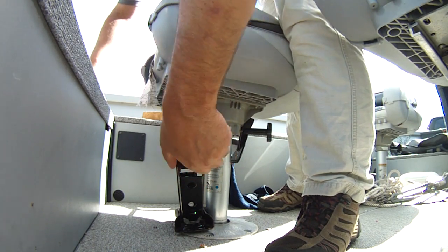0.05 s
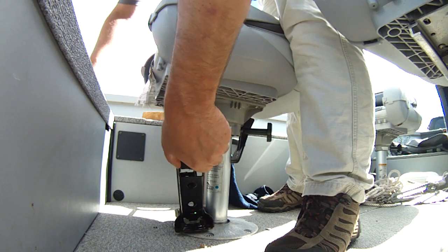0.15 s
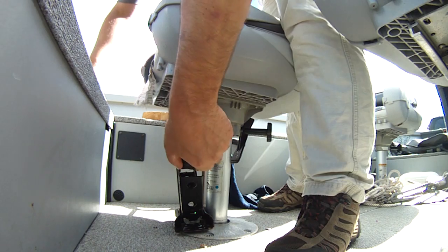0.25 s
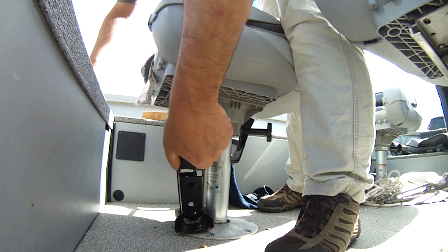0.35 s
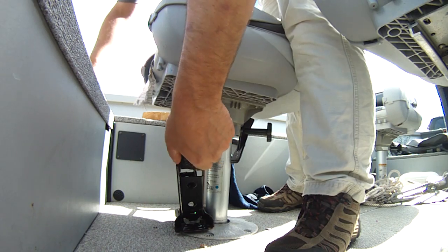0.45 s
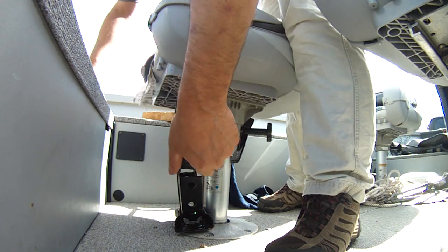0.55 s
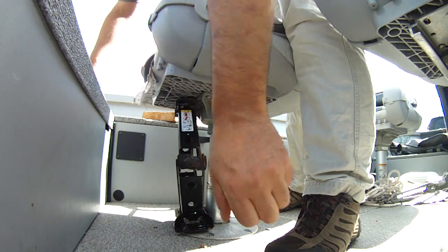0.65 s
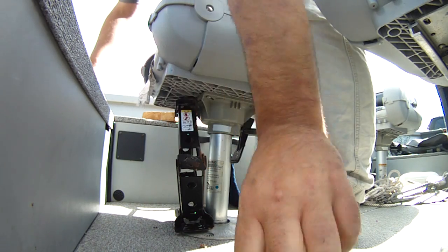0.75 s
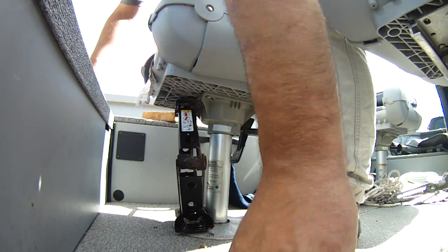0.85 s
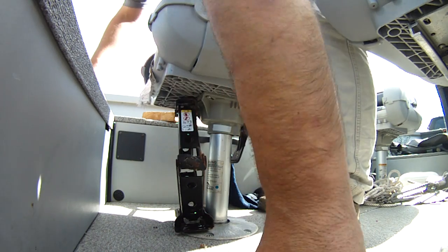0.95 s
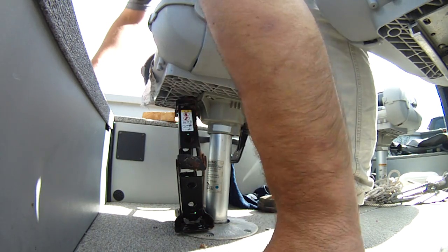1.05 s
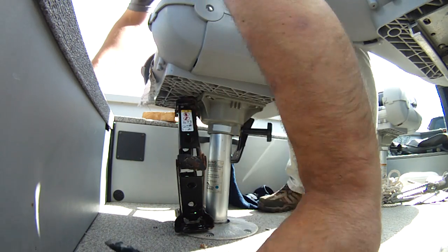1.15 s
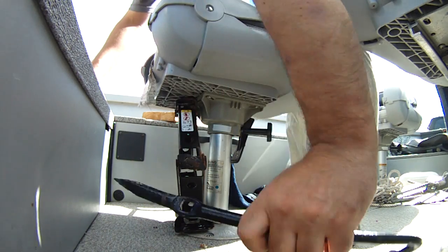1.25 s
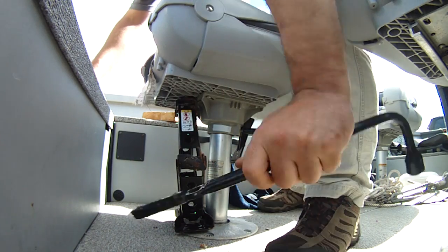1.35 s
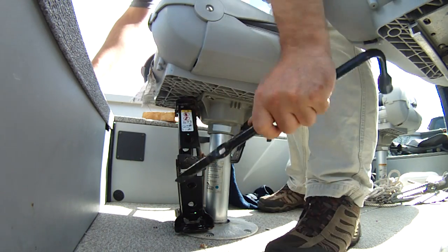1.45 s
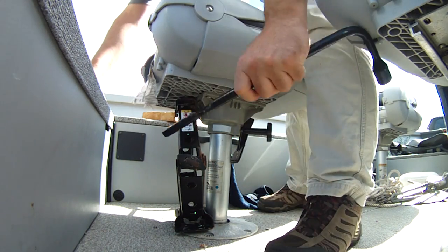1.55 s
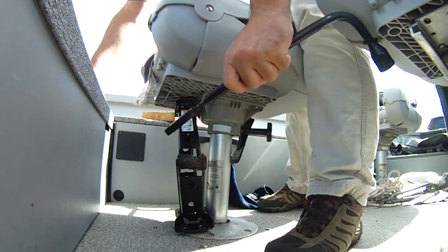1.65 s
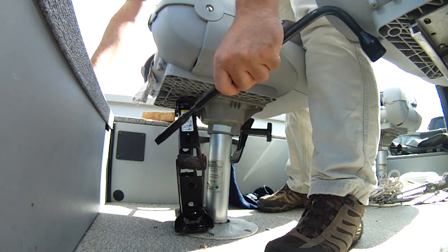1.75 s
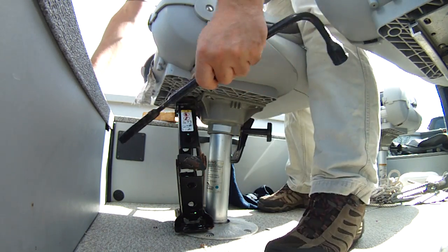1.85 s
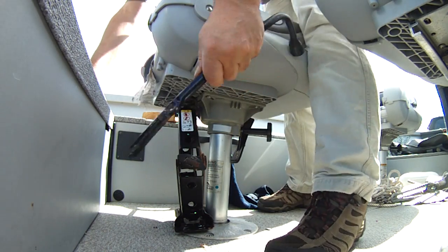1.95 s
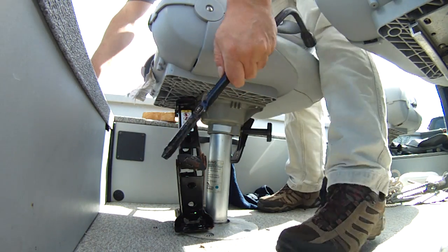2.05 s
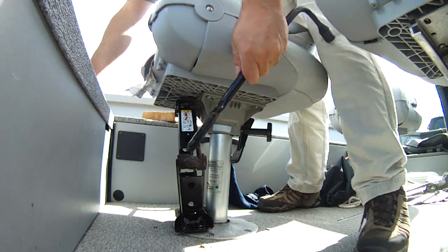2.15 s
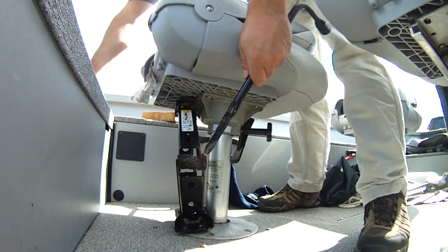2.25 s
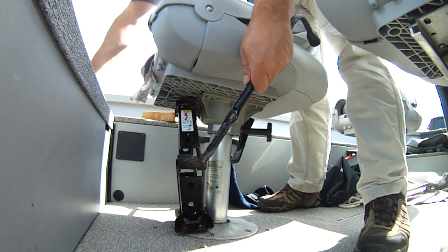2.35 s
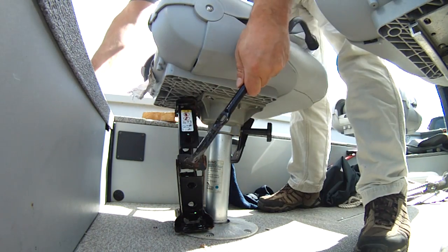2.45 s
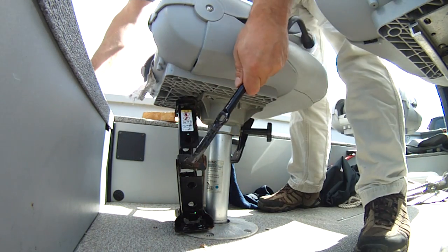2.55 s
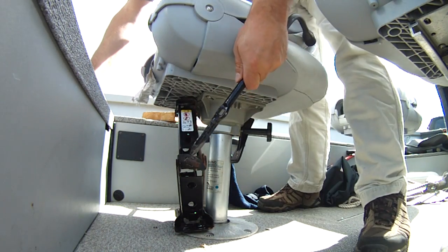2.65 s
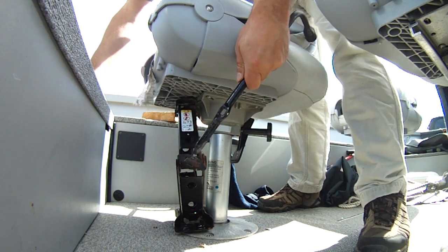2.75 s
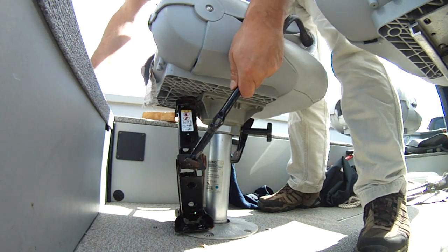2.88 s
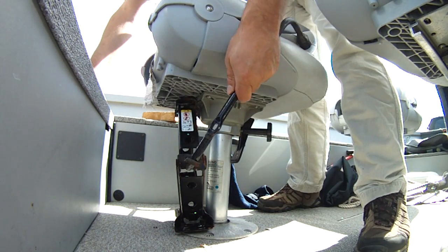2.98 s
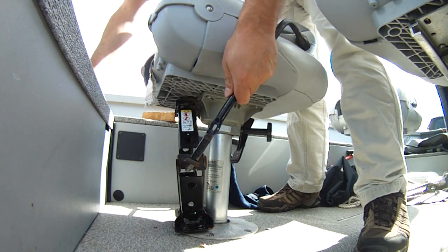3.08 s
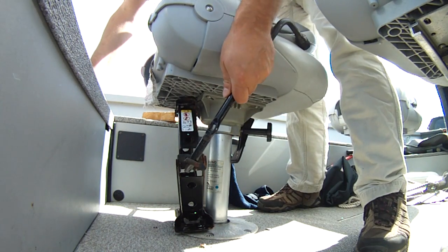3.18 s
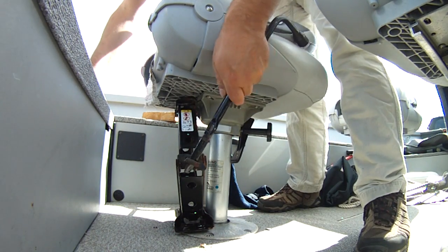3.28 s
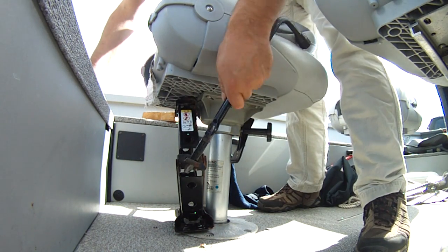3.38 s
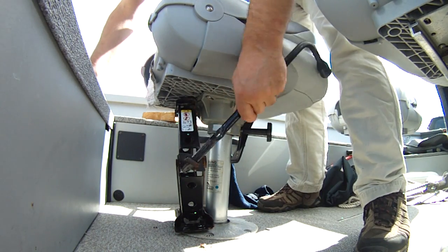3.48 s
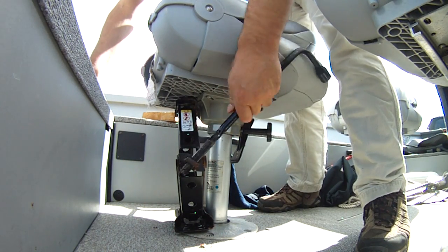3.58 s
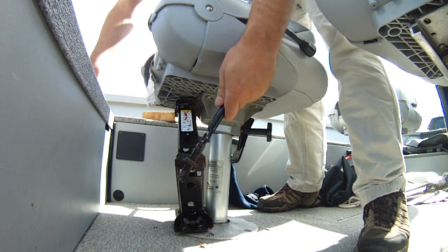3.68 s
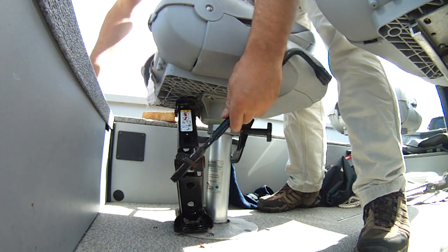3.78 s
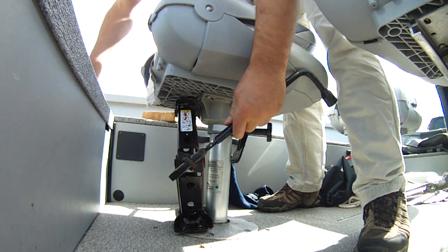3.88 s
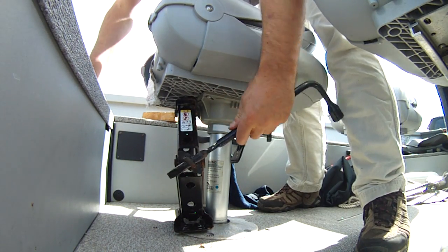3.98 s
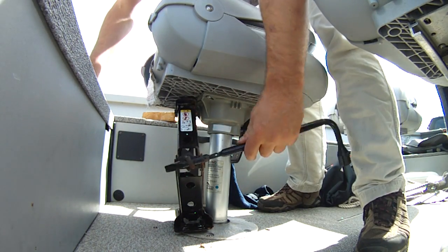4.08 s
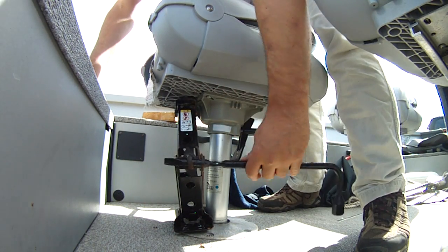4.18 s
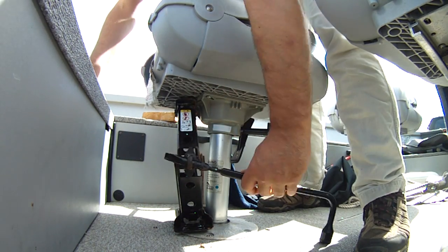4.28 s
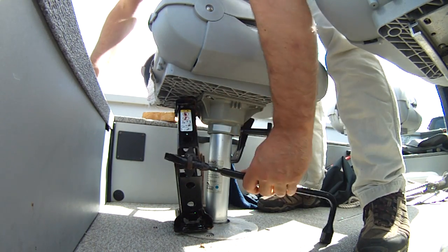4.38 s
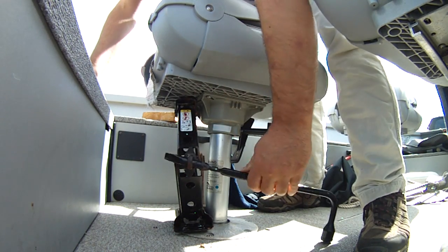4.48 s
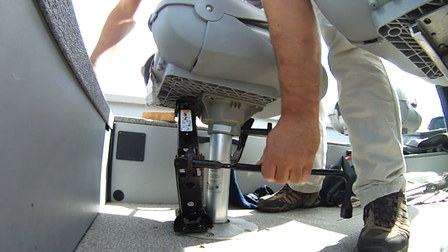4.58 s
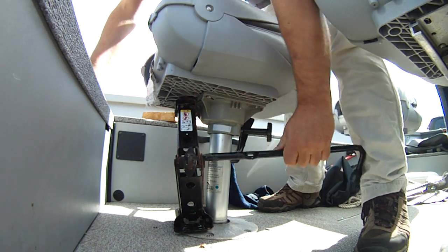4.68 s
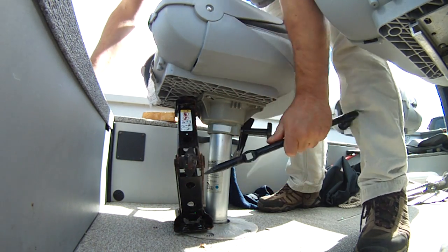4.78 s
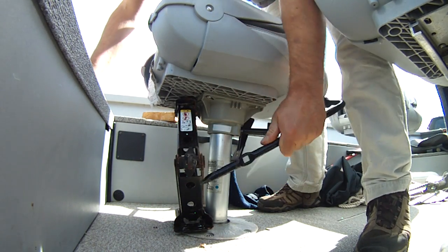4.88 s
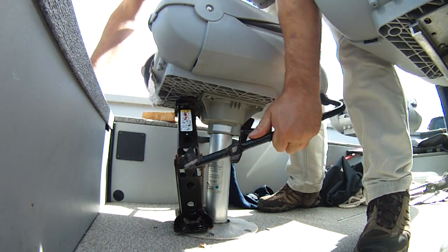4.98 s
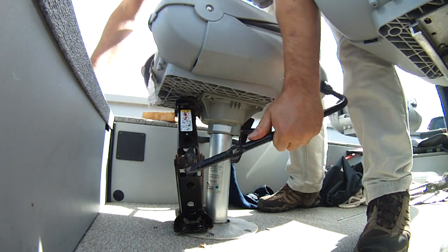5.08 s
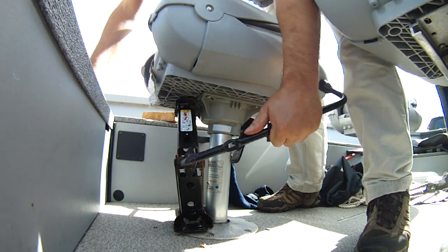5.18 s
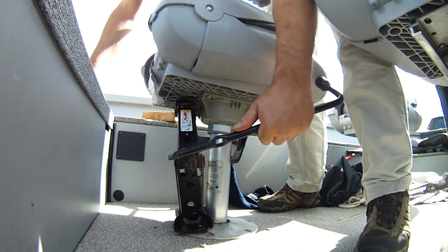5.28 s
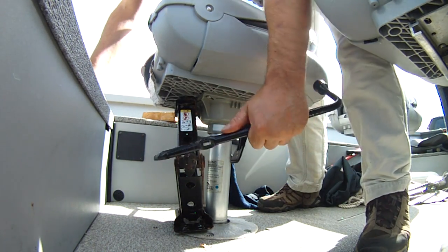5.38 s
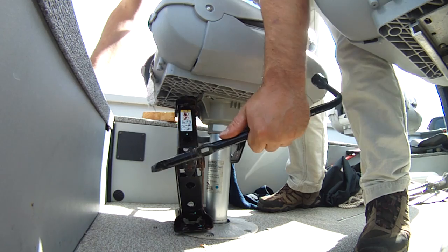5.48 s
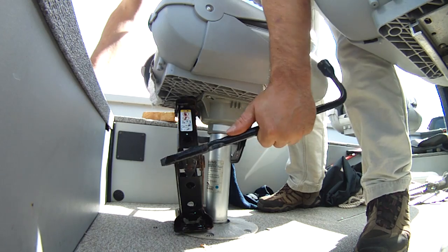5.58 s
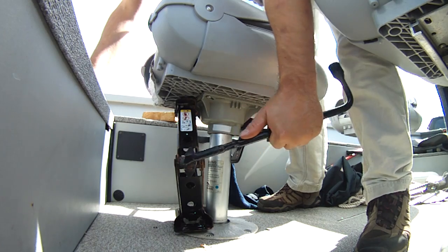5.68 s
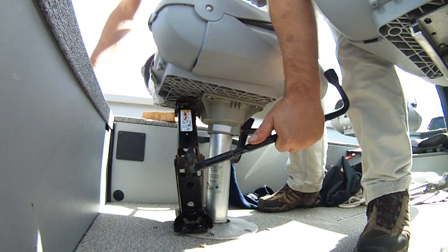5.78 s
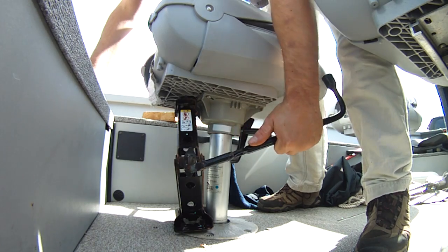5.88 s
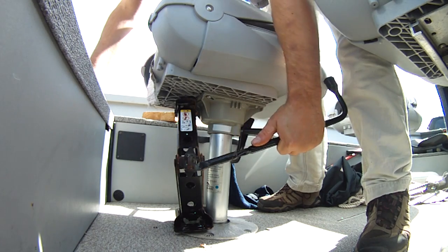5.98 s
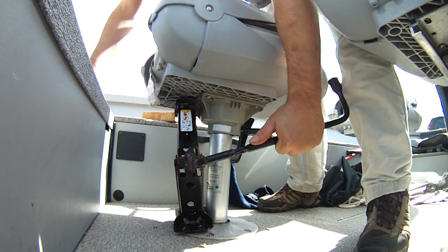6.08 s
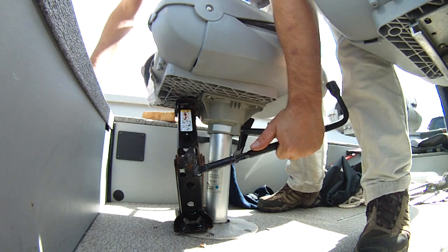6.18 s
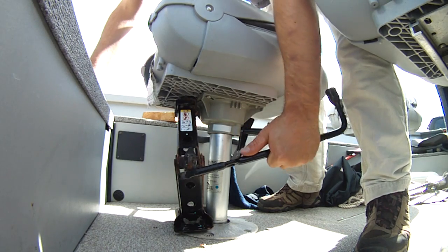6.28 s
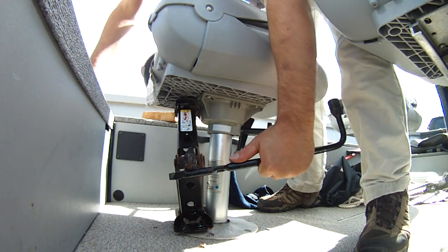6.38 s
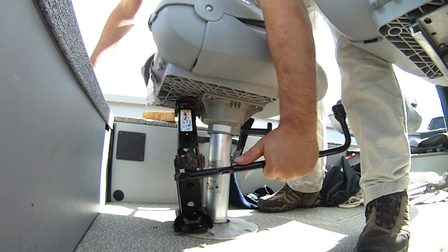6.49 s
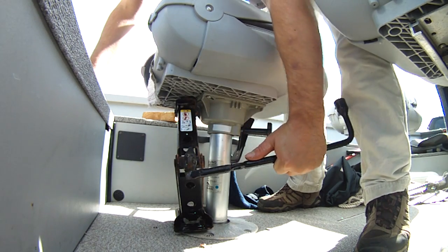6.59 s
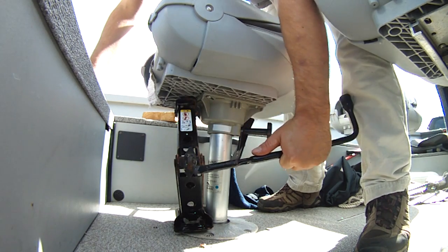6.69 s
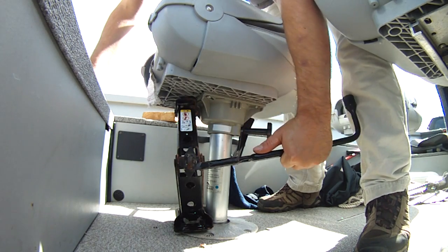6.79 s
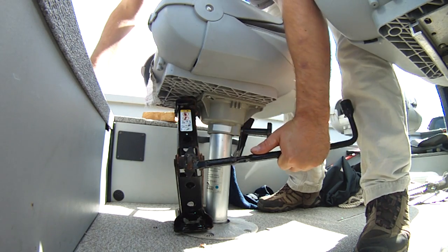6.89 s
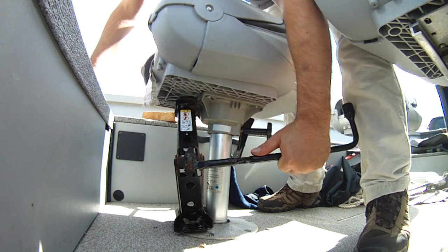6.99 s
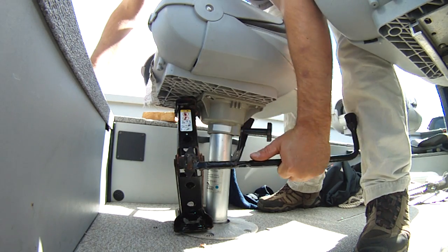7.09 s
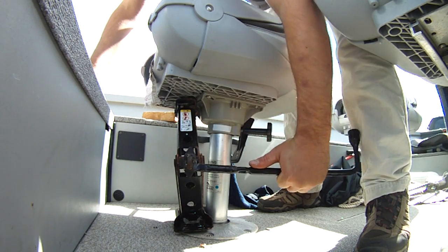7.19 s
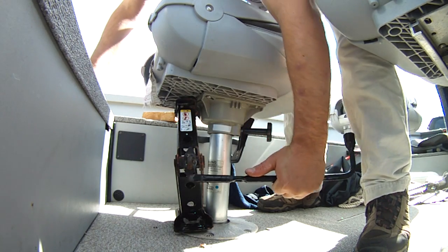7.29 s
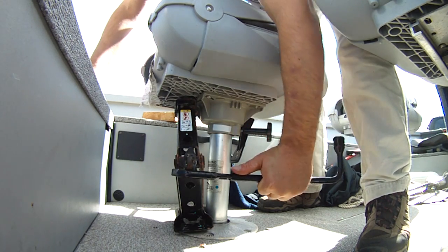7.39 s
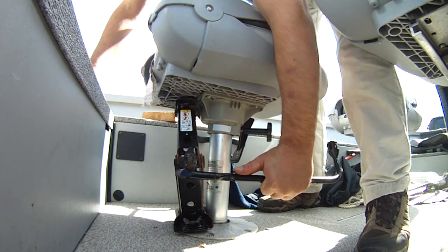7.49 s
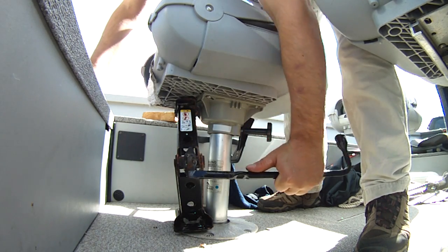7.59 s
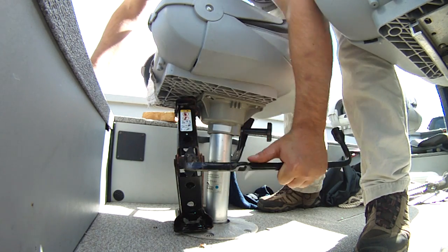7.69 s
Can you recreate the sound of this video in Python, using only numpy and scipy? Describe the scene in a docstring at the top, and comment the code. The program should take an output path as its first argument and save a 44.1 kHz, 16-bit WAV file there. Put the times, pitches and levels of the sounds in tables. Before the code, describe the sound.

Metal rod clunks, scrapes and rattles against a jack in uneven bunches, sharpening to hard clanks, over faint open-air rumble and hiss.

```python
"""A scissor jack under a stuck seat post on a small boat: dull knocks as it is shoved into place, then clanks,
scrapes and pings in irregular bunches as its steel crank rod is poked into the eye and turned.
Trains of tiny impacts drive noise-like and modal responses of jack and hollow carpeted deck together.
Grazes are bright noise bursts, pings are decaying rod modes; below lie a faint noise rumble and hiss."""
import sys
import numpy as np
from scipy import signal
from scipy.fft import rfft, irfft
from scipy.io import wavfile
from scipy.ndimage import uniform_filter1d

SR = 44100
rng = np.random.default_rng(int(sys.argv[2]) if len(sys.argv) > 2 else 0)


def dump_mix(stems):
    """Bounce the given channels to the path in sys.argv[1] as a 16-bit WAV at rate SR."""
    frames = np.atleast_2d(stems).T  # one column per channel
    limited = np.clip(frames, -1, 1)  # hard clip at full scale
    pcm = np.round(limited * 32767).astype(np.int16)
    wavfile.write(sys.argv[1], SR, pcm)


N = 341334
RESPONSE_S = 0.6
T = np.arange(int(RESPONSE_S * SR)) / SR
CONTACT_S = 0.03  # span over which blow, graze and ping levels are reckoned


def amp(db):
    """Decibels to gain."""
    return 10 ** (np.asarray(db) / 20)


def level(x, db, seconds):
    """Scale x to the energy of a sound that holds this rms level for so many seconds."""
    return x * amp(db) * np.sqrt(seconds * SR / np.sum(x ** 2))


def unit_energy(x, db=0):
    """Scale x to an energy of 1, or of db relative to 1."""
    return level(x, db, 1 / SR)


def fade(t60_s):
    """Exponential decay by 60 dB in t60_s."""
    return np.exp(-np.log(1000) * T / t60_s)


def drive(force, response):
    """What a body with this impulse response does under a force."""
    return signal.fftconvolve(force, response)[:len(force)]


def colour(x, spectrum, size=4096):
    """Causal minimum-phase filter with a (Hz, dB) spectrum, built from its cepstrum."""
    hz, db = np.transpose(spectrum)
    bins_hz = np.maximum(np.arange(size // 2 + 1) * SR / size, 1)
    gain = amp(np.interp(np.log(bins_hz), np.log(hz), db))
    cepstrum = irfft(np.log(gain))
    cepstrum[1:size // 2] *= 2  # fold onto positive time
    cepstrum[size // 2 + 1:] = 0
    return drive(x, irfft(np.exp(rfft(cepstrum))))


def ring(modes, scatter_db=1.5, detune=0.0031):
    """Damped modes; each point of contact weights and detunes them a little differently."""
    out = np.zeros(len(T))
    for hz, db, t60_s in modes:
        gain_chance, pitch_chance, sign_chance = rng.standard_normal(3)
        gain = np.sign(sign_chance) * amp(db + scatter_db * gain_chance)
        mode_hz = hz * (1 + detune * pitch_chance)
        out += gain * fade(t60_s) * np.sin(2 * np.pi * mode_hz * T)
    return out


def body(spectrum, t60_s, tail_db, tail_t60_s, direct_db):
    """Unit-energy response of crowded modes: a direct pulse, a quick decay and a faint echo from the cockpit."""
    envelope = fade(t60_s) + amp(tail_db) * fade(tail_t60_s)
    crowd = unit_energy(rng.standard_normal(len(T)) * envelope)
    crowd[0] += amp(direct_db)
    return unit_energy(colour(crowd, spectrum))


def slips(rate_per_s, spread_db):
    """Irregular train of tiny impacts of uneven size and random sign."""
    hits = rng.random(len(T)) < rate_per_s / SR
    sizes = amp(spread_db * rng.standard_normal(len(T)))
    return hits * sizes * rng.choice([-1, 1], len(T))


def add(track, start_s, sound):
    """Mix a sound into the track at a time."""
    start = int(start_s * SR)
    track[start:start + len(sound)] += sound[:N - start]


# Background spectra. Each row: frequency in Hz, relative level in dB.
RUMBLE_SPECTRUM = [(12, -51), (28, -21.5), (42, -2.5), (70, -1.5), (130, -1.5), (215, 0), (350, -5),
                   (600, -14.5), (1500, -33), (5000, -63)]
HISS_SPECTRUM = [(100, 7.5), (1200, 1.5), (2000, -1), (4000, -5), (8000, -8), (15000, -11)]
# Common background level, with sudden dips. Each row: time in seconds, level in dB before the offsets below.
AIR_LEVEL = [(0.0, -75.5), (2.13, -73), (2.77, -67), (3.49, -64.5), (3.86, -67.5), (3.94, -70), (4.21, -70),
             (4.33, -68.5), (4.39, -79), (5.08, -73.5), (5.22, -72.5), (5.77, -68), (5.95, -68),
             (7.14, -64), (7.74, -66.5)]
HISS_OFFSET_DB, RUMBLE_OFFSET_DB = 9.5, 12.5
SIDE_HISS_DB = -10.5  # relative to the shared hiss
RUMBLE_LAG_S = 0.5


def background():
    """Open-air rumble alike in both channels, and hiss with a white part of opposite sign in each."""
    air_db = np.interp(np.arange(N) / SR, *np.transpose(AIR_LEVEL))
    lag = int(RUMBLE_LAG_S * SR)
    slow_air_db = uniform_filter1d(air_db, lag, origin=lag // 2 - 1)  # trailing mean
    rumble = level(colour(rng.standard_normal(N), RUMBLE_SPECTRUM), 0, N / SR)
    hiss = level(colour(rng.standard_normal(N), HISS_SPECTRUM), 0, N / SR)
    side = amp(SIDE_HISS_DB) * rng.standard_normal(N) * np.array([[1], [-1]])
    return amp(RUMBLE_OFFSET_DB + slow_air_db) * rumble + amp(HISS_OFFSET_DB + air_db) * (hiss + side)


# Modes of the jack frame with the rod hooked in, the pressed steel arms and the hollow deck.
# Each row: frequency in Hz, relative level in dB, t60 in seconds.
FRAME_MODES = [(441, -8, .13), (479, -3, .15), (515, -8, .1), (553, 0, .12), (685, -10, .09),
               (824, -3, .22), (864, -9, .15), (950, -13, .09)]
LINK_MODES = [(1251, -12.5, 0.13), (1325, -12.5, 0.25), (1557, -7, 0.047), (1785, -7.5, 0.16),
              (1800, -14, 0.1), (2023, 0, 0.086), (2255, -15, 0.12), (2470, -6, 0.06)]
DECK_MODES = [(121, 0, 0.23), (149, -0.5, 0.15), (184, -7.5, 0.35), (230, -2, 0.2), (263.1, -7, 0.35),
              (289, -8, 0.12), (362, -3.5, 0.28), (423.7, 2.5, 0.16)]
# Dense, quickly damped vibration of frame, linkage and contact point.
# Each row: frequency in Hz, relative level in dB.
FRAME_SPECTRUM = [(200, -27.5), (370, -3.5), (480, 2.5), (560, 1), (650, -5.5), (730, -0.5), (820, -4.5),
                  (960, -11.5), (1200, -19), (2400, -67.5)]
LINK_SPECTRUM = [(700, -45), (1150, -3), (1400, 6), (2000, 1.5), (2400, -2.5), (2800, -15), (5000, -38.5)]
TICK_SPECTRUM = [(1800, -28.5), (2800, 4.5), (4200, 9), (6000, -1.5), (7300, 1), (9000, -15), (15000, -32)]
LOOSE_T60_S, WEDGED_T60_S = 0.11, 0.024  # at grip 0 and 1
LOOSE_RING_DB, WEDGED_RING_DB = 5.5, -28  # clear steel ringing at grip 0 and 1
LINK_DB, LINK_OCTAVES = 2, 1.77  # linkage relative to frame: level, octaves above
TICK_OCTAVES = 2.63  # contact point above frame
DECK_LOW_HZ = 70  # deck high-pass cutoff when deck and frame levels match
DECK_DEEPENS = 0.02  # octaves lower per dB of deck over frame


def jack(force, seconds, frame_db, brightness, deck_db, thud_hz, grip, contact_db):
    """A force shakes deck, frame, linkage and contact point; a wedged jack is dead, loose steel rings on."""
    t60_s = LOOSE_T60_S * (WEDGED_T60_S / LOOSE_T60_S) ** grip
    ring_db = LOOSE_RING_DB + grip * (WEDGED_RING_DB - LOOSE_RING_DB)
    link_db = frame_db + LINK_DB + brightness * LINK_OCTAVES  # brightness in dB per octave
    tick_db = frame_db + contact_db + brightness * TICK_OCTAVES

    thud_shape = [(0.25, -30), (0.48, -5), (1, 0), (1.36, -2), (2.23, -22), (6, -60), (45, -70)]
    thud = [(thud_hz * ratio, db) for ratio, db in thud_shape]
    deck = body(thud, 0.054, tail_db=-23.5, tail_t60_s=0.49, direct_db=0.0)
    deck += unit_energy(ring(DECK_MODES), -10.5)
    low_hz = np.clip(DECK_LOW_HZ * 2 ** (DECK_DEEPENS * (frame_db - deck_db)), 35, 130)
    # a small deck radiates no deep bass
    deck = signal.sosfilt(signal.butter(4, low_hz, "high", fs=SR, output="sos"), deck)

    frame = body(FRAME_SPECTRUM, t60_s, tail_db=-14.0, tail_t60_s=3 * t60_s, direct_db=-5.5)
    frame += unit_energy(ring(FRAME_MODES), ring_db)
    links = body(LINK_SPECTRUM, t60_s, tail_db=-19.5, tail_t60_s=4.0 * t60_s, direct_db=-11)
    links += unit_energy(ring(LINK_MODES), ring_db - 4.5)
    tick = body(TICK_SPECTRUM, 0.56 * t60_s, tail_db=-18, tail_t60_s=1.54 * t60_s, direct_db=-34.5)

    parts = [(deck, deck_db), (frame, frame_db), (links, link_db), (tick, tick_db)]
    return sum(level(drive(force, response), db, seconds) for response, db in parts)


# Steel dragging on steel or carpet. Each row: start in seconds, length in seconds, frame level in dB,
# brightness in dB per octave, deck level in dB, grip from 0 loose to 1 wedged.
SCRAPES = [(1.172, 0.053, -62.5, -10, -50, .6), (1.649, 0.16, -60.5, -6.5, -42.5, .8),
           (2.03, 0.1, -61, -5, -56.5, 0.47), (2.14, .029, -54, -7.5, -38.5, 0.71),
           (2.654, 0.065, -52, -8, -53.5, 0.24), (2.944, 0.019, -29, -6.5, -35, 0.081),
           (2.984, 0.052, -36.5, -5.5, -43.5, 0.086), (3.524, 0.017, -47, -8.5, -34.5, 0.31),
           (3.689, 0.018, -25, -9.5, -35, 0.53), (3.706, 0.045, -28.5, -8, -33, 0.3),
           (3.813, 0.052, -35.5, -9, -42, 0.58), (3.855, 0.021, -27, -13.5, -25, 0.57),
           (6.031, 0.032, -47.5, -7.5, -51.5, 0.2), (6.273, 0.048, -32.5, -9, -38, 0.075),
           (6.325, 0.042, -28, -8, -35, .1), (6.381, 0.087, -31, -14.5, -35.5, .12),
           (7.277, 0.02, -37, -5.5, -37.5, 0.35), (7.314, 0.042, -29.5, -9.5, -36.5, 0.17),
           (7.377, 0.049, -51, -12, -39, .3), (7.453, 0.017, -28, -13, -30, 0.13)]
SCRAPE_THUD_HZ, SLIDING_TICK_DB = 192, -9


def scrapes():
    """Stick and slip: a run of small impacts that swells and lets go."""
    out = np.zeros(N)
    for start_s, length_s, frame_db, brightness, deck_db, grip in SCRAPES:
        pressure = np.sin(np.pi * np.minimum(T / length_s, 1)).clip(0) ** 0.5
        force = slips(rate_per_s=1500, spread_db=3) * pressure
        sound = jack(force, length_s, frame_db, brightness, deck_db, SCRAPE_THUD_HZ, grip, SLIDING_TICK_DB)
        add(out, start_s, sound)
    return out


# The rod's tip grazes an edge. Each row: start in seconds, level in dB.
GRAZES = [(1.222, -71.5), (1.574, -56.5), (2.222, -60.5), (2.992, -61), (3.904, -64), (4.729, -68),
          (5.047, -45.5), (5.097, -60), (5.223, -65), (5.245, -64), (6.14, -46)]
# Spectrum of that click. Each row: frequency in Hz, relative level in dB.
GRAZE_SPECTRUM = [(3000, -16), (6000, 0), (9000, -1.5), (11500, -8.5), (15000, -24)]


def grazes():
    """A brief contact stirs mainly the high treble: a fine bright click of decaying noise."""
    out = np.zeros(N)
    for start_s, db in GRAZES:
        click = body(GRAZE_SPECTRUM, 0.058, tail_db=-30, tail_t60_s=0.12, direct_db=-20)
        add(out, start_s, level(click, db, CONTACT_S))
    return out


# Single contacts. Each row: start in seconds, frame level in dB, brightness in dB per octave,
# deck level in dB, deck thud pitch in Hz, grip from 0 loose to 1 wedged.
BLOWS = [(1.325, -76, -9, -39, 256, .5), (1.571, -37.5, -5.5, -20.5, 164, 0.51),
         (1.609, -41, -6.5, -26.5, 267, 0.57), (1.782, -37, -13, -33.5, 233, 1),
         (2.21, -44, -6, -28, 251, .6), (2.235, -48.5, -6.8, -42.5, 258, .4),
         (2.522, -31.5, -2.8, -33.5, 248, 0.12), (2.935, -40.5, -4, -44.5, 250, .05),
         (3.085, -34.5, -7.5, -27, 195, 0.07), (3.294, -46, -15, -36.5, 176, 0.15),
         (3.5, -43.5, -14, -28.5, 181, .1), (3.658, -31, -9.5, -22, 139, 0.56),
         (3.902, -30, -8, -23, 162, 0.73), (4.356, -20, -10, -14.5, 268, 1),
         (4.366, -50, -13, -24, 295, 0.34), (4.62, -42.5, -11, -47.5, 220, 0.037),
         (4.666, -40.5, -11.5, -44.5, 211, .1), (4.73, -43.5, -6.5, -47, 264, 0.055),
         (4.8, -45.5, -6, -51.5, 194, 0.11), (5.046, -36, -4.5, -37.5, 153, 0.28),
         (5.098, -43, -2.5, -47, 166, 0.085), (5.244, -60, -3.5, -48.5, 143, 0.35),
         (5.744, -25, -4, -27, 257, 0.44), (5.786, -36.5, -11, -38, 229, 0.18),
         (5.893, -49.5, -7.7, -42.5, 247, .1), (6.141, -21.5, -7, -27.5, 163, 0.19),
         (6.258, -29, -4.7, -29, 244, 0.22), (6.36, -28.5, -8, -34, 178, 0.089),
         (6.549, -54, -9, -46, 243, 0.32), (6.719, -26.5, -8, -33.5, 186, 0.084),
         (6.816, -43, -15, -38, 210, 0.19), (6.946, -23.5, -9, -23.5, 288, 0.34),
         (7.296, -27.5, -10.5, -27, 270, 0.12), (7.431, -16.5, -8.5, -21.5, 200, 0.24)]
CHATTER_S, CHATTER_KNEE_DB = 0.01, -22  # decay constant of weak blows; above the knee it shortens fast
CHATTER_RISE_S, BLOW_DELAY_S = 0.0012, 0.00106
STRUCK_TICK_DB = -2.5


def blows():
    """A first touch, then the slack joints close one after another and settle; the harder the blow, the sooner."""
    out = np.zeros(N)
    for start_s, frame_db, brightness, deck_db, thud_hz, grip in BLOWS:
        hardness = amp(max(frame_db, deck_db) - CHATTER_KNEE_DB) ** 2
        chatter_s = CHATTER_S / (1 + hardness)
        envelope = np.exp(-T / chatter_s) * (1 - np.exp(-T / CHATTER_RISE_S))
        force = 0.28 * slips(rate_per_s=1800, spread_db=3) * envelope
        force[0] += 0.8  # first touch
        sound = jack(force, CONTACT_S, frame_db, brightness, deck_db, thud_hz, grip, STRUCK_TICK_DB)
        add(out, start_s + BLOW_DELAY_S, sound)
    return out


# The rod bounces free and sings. Each row: start in seconds, level in dB, centre of the excited modes in Hz.
PINGS = [(2.522, -48.5, 4560), (2.993, -64, 8300), (4.73, -54.5, 4800), (5.046, -42, 8900),
         (5.097, -53, 6560), (5.744, -49, 4200), (6.142, -47, 5860), (6.721, -59, 5300), (7.284, -62, 4200),
         (7.431, -53.5, 2800)]
# High modes of the solid crank rod. Each row: frequency in Hz, relative level in dB, t60 in seconds.
ROD_MODES = [(3716, -3, .15), (4026, 0, .17), (4960, -7, .11), (5560, -10, .12), (7017, -1, .17),
             (8612, 0, .14), (13566, -2, .11)]
PING_SLOPE_DB, PING_REST_DB = 26, -16.5  # loss one octave from the centre; limit of the loss


def pings():
    """Each bounce rings the rod modes near its centre most, but all ring a little."""
    out = np.zeros(N)
    for start_s, db, centre_hz in PINGS:
        modes = []
        for hz, mode_db, t60_s in ROD_MODES:
            excitation_db = max(-PING_SLOPE_DB * np.log2(hz / centre_hz) ** 2, PING_REST_DB)
            modes.append((hz, mode_db + excitation_db, t60_s))
        song = ring(modes, scatter_db=0.5, detune=0.0004)
        add(out, start_s, level(song, db, CONTACT_S))
    return out


def scene():
    """The jack stands straight ahead, alike in both channels, over the two-channel background."""
    return background() + scrapes() + grazes() + blows() + pings()


def record(dry):
    """The camera on the deck rounds the highest peaks and cuts the top."""
    rounded = np.tanh(dry)
    top_cut = signal.ellip(10, 0.2, 70, 15450, fs=SR, output="sos")  # ripple dB, stopband dB, cutoff Hz
    return signal.sosfilt(top_cut, rounded)


dry = scene()
out = record(dry)
dump_mix(out)
```